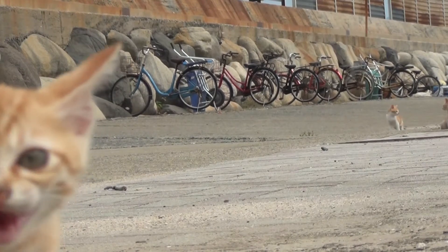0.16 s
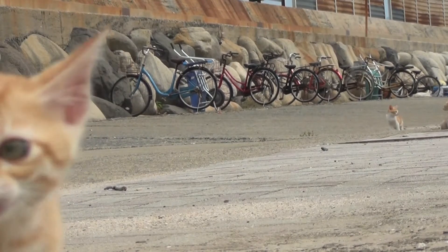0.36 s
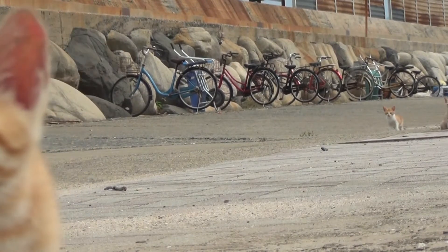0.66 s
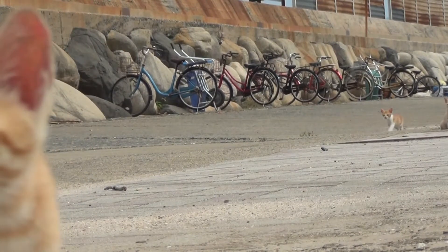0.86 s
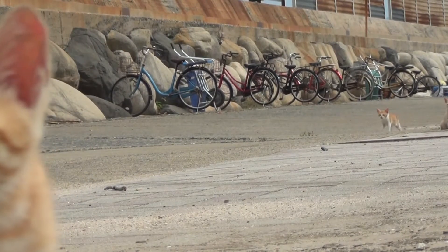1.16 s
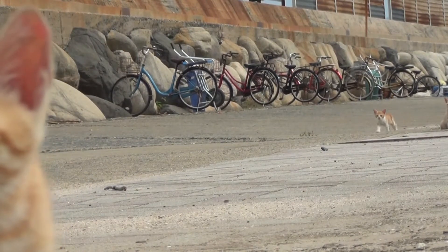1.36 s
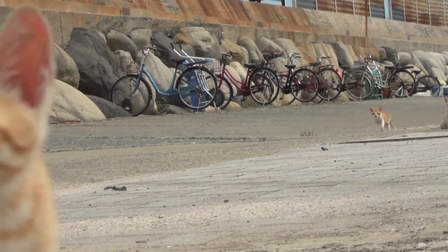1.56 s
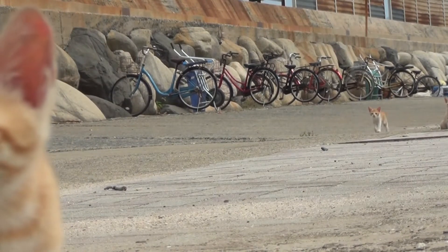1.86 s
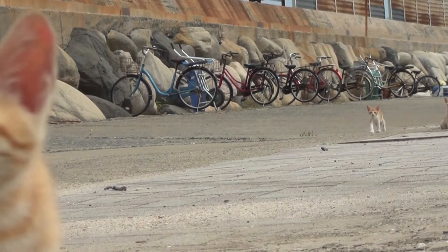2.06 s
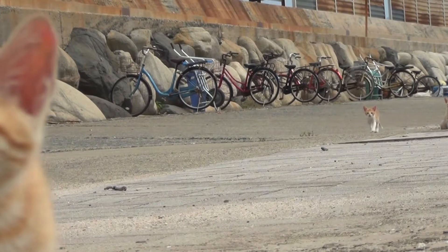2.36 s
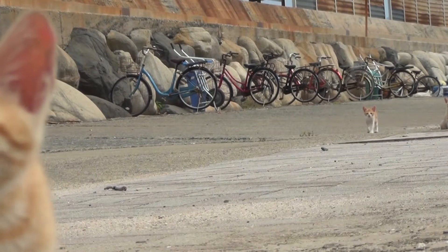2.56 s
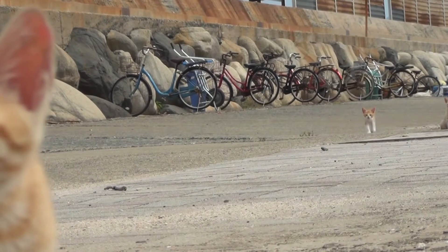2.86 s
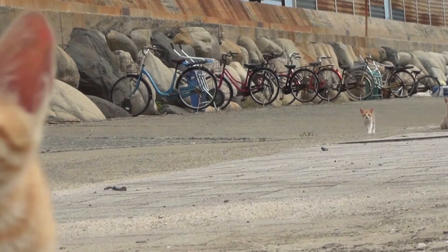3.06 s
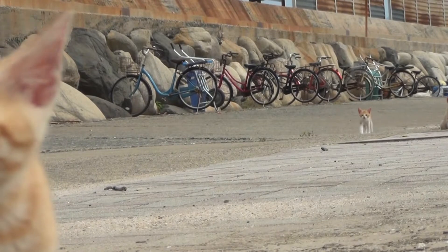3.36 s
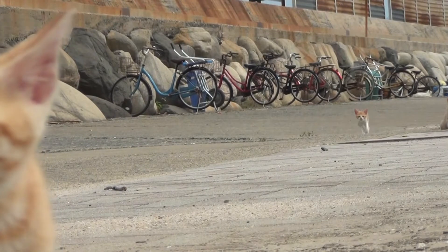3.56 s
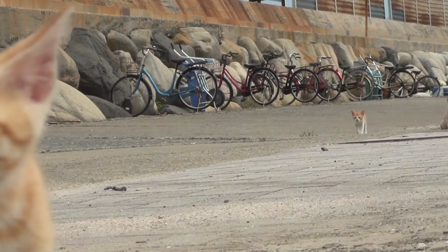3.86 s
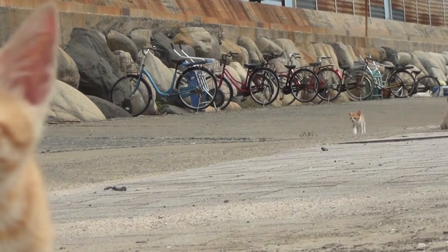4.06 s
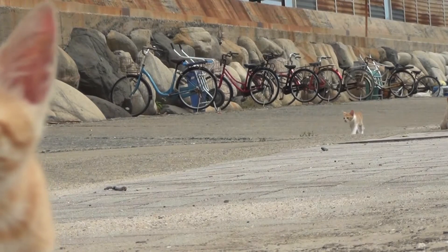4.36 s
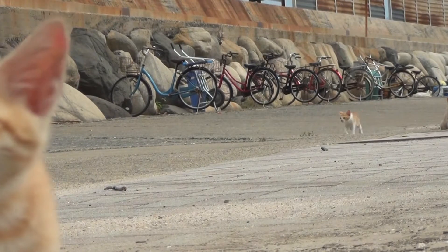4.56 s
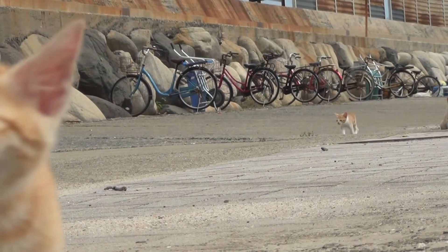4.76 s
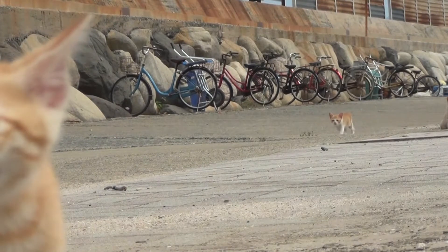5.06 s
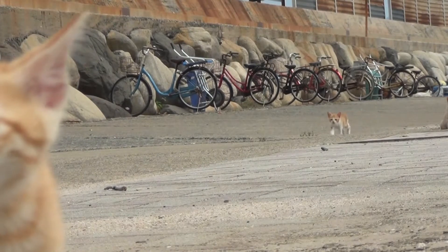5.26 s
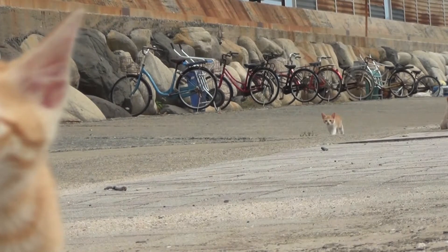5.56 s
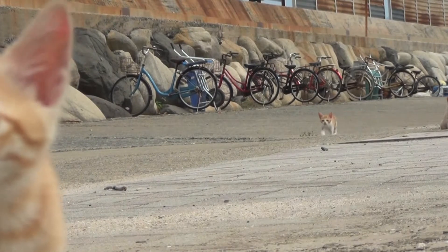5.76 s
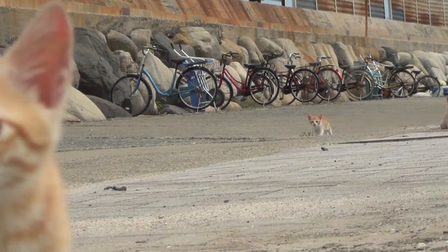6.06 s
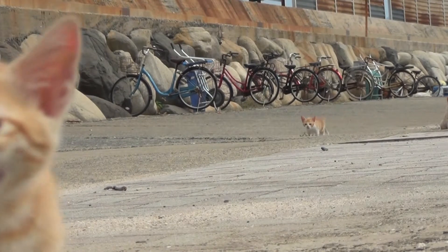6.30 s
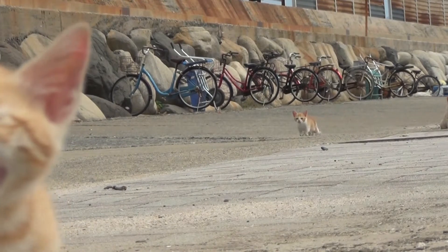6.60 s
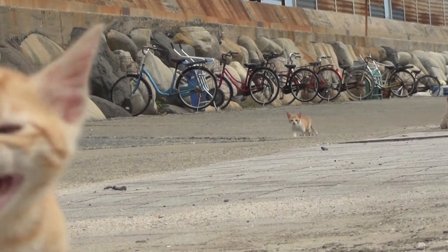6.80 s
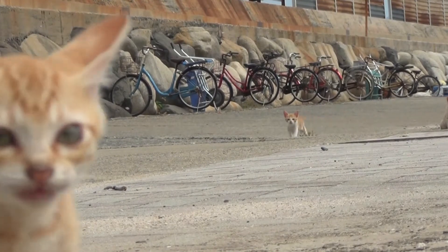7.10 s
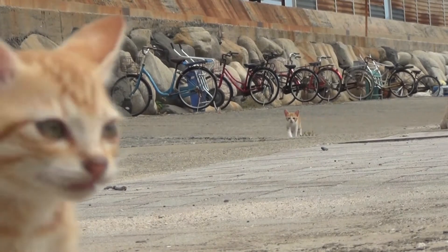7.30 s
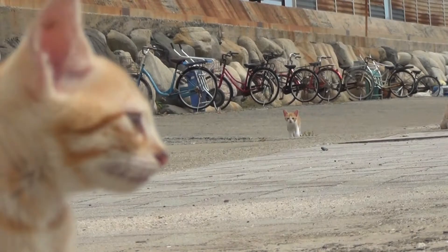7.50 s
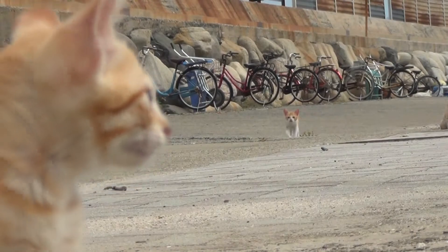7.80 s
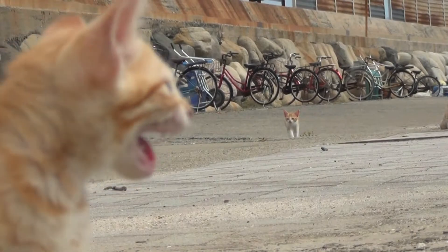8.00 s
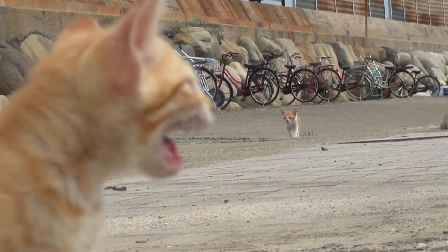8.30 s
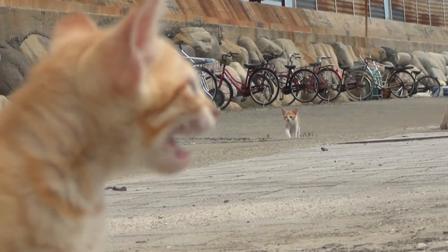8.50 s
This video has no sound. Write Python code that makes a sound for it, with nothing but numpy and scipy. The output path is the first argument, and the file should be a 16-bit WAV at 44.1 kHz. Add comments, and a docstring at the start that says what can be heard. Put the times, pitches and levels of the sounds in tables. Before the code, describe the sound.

Close to the microphone and slightly left, a small kitten meows five times, the first already under way. The calls are high, thin and pleading, scooping up, then sliding down as the mouth closes, with pauses of under a second to about a second and a half. Behind lies an open harbour quay: airy wash, a distant engine humming low, and soft rumble that swells most under the fourth meow. Almost no echo.

```python
"""A kitten close by, left of centre, gives five long, falling meows on an open quay.
The first is already under way; the others start hoarse, brighten as the mouth opens and darken as it shuts.
Each meow is a sum of harmonics, rasp and half-pitch lines, with levels set by a moving vocal tract.
Two small ticks are filtered noise bursts; a distant engine is noise in narrow exhaust resonances.
Shaped noise makes the harbour air and a low rumble that swells now and then, most during the fourth meow."""
import sys
import numpy as np
from scipy import signal
from scipy.fft import rfft, irfft, next_fast_len
from scipy.io import wavfile

SR = 44100
rng = np.random.default_rng(int(sys.argv[2]) if len(sys.argv) > 2 else 0)


def wav_out(sig):
    """Save sig, one row per channel (or a flat mono array), as 16-bit PCM at SR to the path in sys.argv[1]."""
    wavfile.write(sys.argv[1], SR, np.round(np.clip(np.atleast_2d(sig).T, -1, 1) * 32767).astype(np.int16))


N = 381024
TIME = np.arange(N) / SR

# The five meows. Each row: start in seconds, end in seconds, length of the upward scoop in seconds,
# final fall as a share of pitch, hoarseness with the mouth wide open (0-1),
# time the tongue stays down in seconds, extra treble in dB.
MEOWS = [(-.3, .53, .1, 0.073, 0.37, 0.31, 5), (2.018, 3.555, .17, 0.23, .45, 0.49, 2.5),
         (4.443, 5.684, .09, 0.22, 0.08, 0.56, -0.5), (6.22, 7.138, .12, .24, 0.09, 0.63, 1),
         (7.929, 8.609, 0.097, 0.25, 0.07, 0.48, -.5)]
# Melody between scoop and fall, one list a meow. Each row: time in seconds, pitch in Hz.
MELODIES = [
    [(0.0, 627), (0.014, 622), (0.1, 604.8), (0.244, 543), (0.274, 559), (0.41, 477)],
    [(2.18, 694), (2.378, 680), (2.46, 647), (2.638, 574), (2.738, 553), (2.874, 544), (2.974, 530),
     (3.088, 593), (3.152, 604), (3.256, 581), (3.46, 504)],
    [(4.52, 670), (4.548, 658), (4.576, 632.6), (4.778, 646.1), (4.856, 630), (4.952, 610), (5.11, 536.4),
     (5.172, 530.4), (5.28, 532), (5.344, 509.6), (5.476, 493), (5.59, 466.9)],
    [(6.33, 629), (6.386, 629), (6.396, 653), (6.556, 626.5), (6.582, 607.6), (6.76, 587), (6.798, 597.3),
     (6.834, 576), (6.852, 554.4), (7.04, 489)],
    [(8.02, 636), (8.066, 632), (8.078, 616), (8.118, 604), (8.14, 625), (8.344, 603.5), (8.452, 523),
     (8.482, 518.8), (8.52, 499)],
]
# Jaw and effort, one list a meow. Each row: time in seconds, mouth resonance in Hz, effort in dB.
GESTURES = [
    [(0, 3030, -4.5), (.12, 2500, 0.5), (.18, 1650, -5.5), (.25, 1450, 4), (.33, 1313, 0.5),
     (.42, 1080, -3.5), (.52, 1020, -17)],
    [(2.15, 3500, -6.5), (2.27, 3550, -9.5), (2.44, 3220, -5), (2.52, 2570, -5.5), (2.62, 1810, -5),
     (2.82, 1540, -6), (2.98, 1500, -2), (3.06, 1790, -2.5), (3.18, 2640, -5), (3.33, 1930, 0),
     (3.48, 1760, -0.5), (3.55, 1605, -8)],
    [(4.55, 4000, -1.5), (4.7, 4300, 0), (4.86, 4030, 1.5), (4.95, 3690, 1), (5.0, 3360, -0.5),
     (5.075, 2900, -4.5), (5.11, 2015, 1), (5.32, 2023, 0), (5.43, 1863, -2), (5.54, 1840, 2.5),
     (5.68, 1620, -5.5)],
    [(6.29, 4150, -2.5), (6.36, 4610, 1), (6.41, 4660, 2.5), (6.49, 4570, 3.5), (6.55, 4320, 5.5),
     (6.77, 4180, 3.5), (6.86, 3405, 2), (6.92, 2785, 4), (7.01, 1860, 1.5), (7.13, 1440, -6.5)],
    [(8.02, 4660, -1), (8.16, 4240, -4), (8.26, 4080, -3.5), (8.35, 4230, -2), (8.41, 3120, -0.5),
     (8.47, 2720, -2), (8.53, 1956, -7.5), (8.61, 1500, -14)],
]
# The kitten's place, from the left towards the middle. Each row: time in seconds, left minus right in dB.
PAN = [(0, 1.9), (3, 2.5), (5.3, 2), (6.5, 2), (8.3, 1)]


def kitten():
    """The meows, a little to the left."""
    pan_db, = in_time(PAN, TIME)
    voice = sum(meow(*call) for call in zip(MEOWS, MELODIES, GESTURES))
    return voice * from_db(pan_db * np.array([[.5], [-.5]]))


SCOOP_SHARE, SCOOP_BEND = .21, 1.5  # the pitch starts this share below its melody
FALL_S, FALL_BEND = .105, 1.4  # and drops at the end as the folds slacken
ONSET_ROUGH_S = .07  # the folds settle over this time
ONSET_WOBBLE, WOBBLES_PER_S = 0.0197, 45  # before that they stagger in pitch
OPENING_S, OPENING_SHARE = 0.049, 0.45  # the mouth resonance starts this share lower
ATTACK_S, ATTACK_DB, RELEASE_S = .055, 21.5, 0.018  # effort builds from this far below; the voice stops quickly
TONGUE_SNAP = 7.4  # how briskly the tongue lifts
# Strength of the rasp beside the harmonics, before hoarseness scales it. Each row: frequency in Hz, level in dB.
RASP = [(1200, -20), (3000, -11), (5000, -5.5), (7000, 2.5), (12000, -1)]


def meow(row, melody, gesture, jitter=0.0033, cycle_jitter=0.19, shimmer_db=0.94, rasp_burst_db=1.0, count=60):
    """The vocal folds give harmonics, rasp and at times half-pitch lines, all shaped by the tract."""
    start, end, scoop_s, fall, hoarse, tongue_s, treble_db = row
    t = TIME[(TIME >= start) & (TIME < end)]
    age, left = t - start, end - t
    # the pitch scoops up, follows its melody and drops
    pitch, = in_time(melody, t)
    pitch = pitch * (1 - SCOOP_SHARE * ramp(1 - age / scoop_s) ** SCOOP_BEND)
    pitch = pitch * (1 - fall * ramp(1 - left / FALL_S) ** FALL_BEND)
    pitch = pitch * (1 + ONSET_WOBBLE * np.exp(-age / ONSET_ROUGH_S) * flutter(t, WOBBLES_PER_S))
    # the mouth opens as the effort builds
    mouth_hz, effort_db = in_time(gesture, t)
    mouth_hz = mouth_hz * (1 - OPENING_SHARE * np.exp(-age / OPENING_S))
    effort_db = effort_db - ATTACK_DB * np.exp(-age / ATTACK_S)
    tongue_down = np.exp(-(age / tongue_s) ** TONGUE_SNAP)
    rough, doubling = hoarseness(t, age, mouth_hz, hoarse)
    # hoarse folds waver more, and their rasp comes in short bursts
    pitch = pitch * (1 + jitter * (1 + 2 * rough) * flutter(t, 90.04))
    rough = rough * from_db(rasp_burst_db * flutter(t, 48.2))
    # uneven cycles smear the high harmonics most
    phase = 2 * np.pi * np.cumsum(pitch) / SR + cycle_jitter * rough * flutter(t, 450)
    coarse = slice(None, None, 64)  # the tract moves slowly enough to be computed every 64 samples
    tract_state = [x[coarse] for x in (tongue_down, mouth_hz, effort_db)]
    out = np.zeros(len(t))
    for k in range(2, count):  # k counts half-harmonics
        hz = k / 2 * pitch[coarse]
        gain = np.interp(t, t[coarse], tract(t[coarse], hz, *tract_state, treble_db))
        # strong and weak cycles in turn put lines halfway between the harmonics
        line = doubling if k % 2 else 1
        rasp = from_db(at_hz(RASP, hz.mean())) * rough * flutter(t, 330)
        # the tract spreads each pulse in time: k * k / 20
        out += gain * (line + rasp) * np.cos(k / 2 * phase + k * k / 20)
    fade = ramp(np.minimum(age, left) / RELEASE_S)
    shimmer = from_db(shimmer_db * flutter(t, 68.83))
    out *= fade * shimmer / np.sqrt(1 + rough ** 2)
    before = np.searchsorted(TIME, start)
    return np.pad(out, (before, N - before - len(t)))


ONSET_ROUGH, ONSET_DOUBLING = 0.7, 0.18  # hoarse and skipping cycles at first
CALM_ROUGH, CALM_DOUBLING = 0.046, 0.019  # what remains once settled
CRACK_EDGE_S = 0.024
# The voice cracks. Each row: start in seconds, end in seconds, added roughness (0-1),
# added share of period doubling (0-1).
CRACKS = [(2.11, 2.19, .35, .15), (4.51, 4.56, .05, .6), (4.57, 4.78, .3, .03), (6.35, 6.52, .27, .8),
          (8.065, 8.135, .2, .3)]


def hoarseness(t, age, mouth_hz, hoarse):
    """Roughness and period doubling: at the onset, with a wide mouth, and where the voice cracks."""
    settling = np.exp(-age / ONSET_ROUGH_S)
    widest_hz = VOWELS[-1][0]
    rough = CALM_ROUGH + ONSET_ROUGH * settling + hoarse * (mouth_hz / widest_hz) ** 2
    doubling = CALM_DOUBLING + ONSET_DOUBLING * settling
    for start, end, added, share in CRACKS:
        inside = ramp(np.minimum(t - start, end - t) / CRACK_EDGE_S + .5)
        rough, doubling = rough + added * inside, doubling + share * inside
    return ramp(rough), ramp(doubling)


NOSE_HZ, NOSE_WIDTH_HZ, NOSE_DB = 6000, 900, -26  # faint, and also sounds with the mouth nearly shut
# Fixed colour of the throat. Each row: frequency in Hz, gain in dB.
THROAT = [(600, -15), (1100, 1.5), (1400, 8), (1850, 2), (2400, -11), (3100, -28), (4500, -29), (8000, -49)]
# Fixed colour of the upper resonance. Each row: frequency in Hz, gain in dB.
UPPER = [(3000, -15), (4500, -6), (5300, -1), (6200, -7), (7100, -8), (7800, -7.5), (9000, -9.3),
         (10000, -11), (11000, -16), (15500, -26)]
# The head turns to the side. Each row: time in seconds, turn from 0 facing to 1 in profile.
TURN = [(7.2, 0), (7.6, 1)]
# Change of colour in profile. Each row: frequency in Hz, gain in dB.
PROFILE = [(1300, -1), (1850, 0.5), (2500, 6.5), (3100, -4.5), (3800, -3), (5600, -5.5), (7500, -10.5),
           (9300, -3), (11800, 0), (13800, 7)]
# Fixed peaks and hollows of the head. Each row: centre in Hz, half-width in Hz, gain in dB.
HEAD = [(6200, 500, 1), (9300, 650, 5), (10550, 450, -7)]


def tract(t, hz, tongue_down, mouth_hz, effort_db, treble_db,
          mouth_width_hz=340, widening=1.0, upper_width_hz=2000, leak_db=-20,
          top_hz=12000, top_width_hz=1400, top_db=-30, back_hz=3100, back_width_hz=260, back_db=-4):
    """Height of a partial at frequency hz: the throat, two moving and three fixed resonances side by side."""
    throat_db, mouth_db, upper_hz, upper_db = vowel(tongue_down, mouth_hz, effort_db)
    turn, = in_time(TURN, t)
    opening = mouth_hz / 2000
    throat = from_db(throat_db + at_hz(THROAT, hz))
    # an open mouth radiates more, so its resonance is wider
    mouth = from_db(mouth_db) * resonance(hz, mouth_hz, mouth_width_hz * opening ** widening) ** 2
    # some treble leaks past the upper resonance on either side
    upper_shape = np.hypot(resonance(hz, upper_hz, upper_width_hz) ** 2, from_db(leak_db))
    upper = from_db(upper_db + treble_db + at_hz(UPPER, hz)) * upper_shape
    # two fixed resonances get out only through an open mouth
    gape = (opening / 2) ** 4
    back = from_db(throat_db + back_db) * gape * resonance(hz, back_hz, back_width_hz)
    top = from_db(upper_db + top_db) * gape / 2 * resonance(hz, top_hz, top_width_hz)
    nose = from_db(throat_db + NOSE_DB) * resonance(hz, NOSE_HZ, NOSE_WIDTH_HZ)
    head_db = turn * at_hz(PROFILE, hz)
    head_db = head_db + sum(db * resonance(hz, centre, width) for centre, width, db in HEAD)
    power = throat ** 2 + mouth ** 2 + upper ** 2 + back ** 2 + top ** 2 + nose ** 2
    return np.sqrt(2 * power) * from_db(head_db)


THROAT_FOLLOWS, UPPER_FOLLOWS = 0.56, 1.24  # dB gained per dB of effort; the mouth follows one to one
TONGUE_HZ = 6290  # the upper resonance while the tongue is down
STRAIN_HZ_PER_DB = 90  # effort raises the upper resonance once the tongue lifts
# The tract from nearly shut to wide open, at zero effort. Each row: mouth resonance in Hz,
# throat level in dB, mouth level in dB, upper resonance in Hz, upper level in dB.
VOWELS = [(1150, -57, -23.5, 7900, -65), (1510, -40.5, -20, 10400, -51.5), (1900, -37, -26, 8740, -51.5),
          (2480, -38, -32, 8660, -43.5), (3300, -38, -31.5, 9250, -35.5), (4110, -37, -28.5, 7500, -29.5),
          (4690, -44.5, -37, 7000, -24.5)]


def vowel(tongue_down, mouth_hz, effort_db):
    """Jaw and tongue set the resonances; effort lifts the high ones most."""
    throat_db, mouth_db, upper_hz, upper_db = in_time(VOWELS, mouth_hz)
    lifted_hz = upper_hz + STRAIN_HZ_PER_DB * effort_db
    upper_hz = tongue_down * TONGUE_HZ + (1 - tongue_down) * lifted_hz
    throat_db = throat_db + THROAT_FOLLOWS * effort_db
    return throat_db, mouth_db + effort_db, upper_hz, upper_db + UPPER_FOLLOWS * effort_db


def near_echo(sound, echo_db=-13, left_s=0.000823, right_s=0.000844):
    """One close, inverted reflection ripples the spectrum, a little differently on each side."""
    echo = [np.interp(TIME - delay, TIME, channel) for channel, delay in zip(sound, (left_s, right_s))]
    return sound - from_db(echo_db) * np.array(echo)


def quay(sound, scatter_db=-24, t60=0.052):
    """Ground and sea wall scatter a faint, short tail."""
    t = np.arange(SR // 2) / SR
    tail = rng.standard_normal((2, len(t))) * from_db(-60 * t / t60) * (t > .003)
    tail /= np.sqrt(np.sum(tail ** 2, axis=1, keepdims=True))
    return from_db(scatter_db) * signal.fftconvolve(sound, tail, axes=1)[:, :N]


# Parts of two small ticks, the second made of three resonances.
# Each row: start in seconds, level before the decay in dB, centre in Hz.
TICK_PARTS = [(.731, -45, 14000), (3.057, -30, 3050), (3.057, -39, 4500), (3.056, -44, 11800)]


def ticks(t60=0.038, width_share=0.07):
    """Each part of a tick is a tiny, decaying burst of noise in one broad resonance."""
    out, t = np.zeros(N), np.arange(SR // 20) / SR
    hz = np.fft.rfftfreq(len(t), 1 / SR)
    for s, db, centre in TICK_PARTS:
        noise = rfft(rng.standard_normal(len(t)))
        grain = irfft(noise * resonance(hz, centre, width_share * centre), len(t))
        at = int(s * SR)
        out[at:at + len(t)] += rms_one(grain) * from_db(db - 60 * t / t60)
    return out


# Level of the distant engine. Each row: time in seconds, level in dB.
ENGINE_LEVEL = [(0, -27), (1.3, -25.5), (2.4, -29), (3.2, -28.5), (3.9, -31.5), (5.1, -26), (6.2, -28.5),
                (7.1, -25.5), (7.8, -29.5), (8.64, -30.5)]
# Its exhaust resonances. Each row: centre in Hz, full width at half gain in Hz, relative level in dB.
EXHAUST = [(136.8, 30, 1), (171, 60, -10), (199.6, 22, -6.5)]


def engine():
    """Far exhaust noise booms in a few narrow resonances."""
    def exhaust(hz):
        return sum(from_db(db) * resonance(hz, centre, width / 2) for centre, width, db in EXHAUST)
    level_db, = in_time(ENGINE_LEVEL, TIME)
    return from_db(level_db) * stereo_noise(exhaust)


AIR_DB = -32.5
DEEP_HZ, DEEP_WIDTH_HZ = 46.4, 90  # deep bass: centre and half-width
# Colour of the harbour air. Each row: frequency in Hz, relative density in dB per Hz.
AIR = [(25, -15), (60, -4), (100, -2), (250, -3), (450, -5), (900, -12), (1300, -18.5), (2100, -21),
       (2500, -26.5), (4200, -28), (5000, -34.5), (9000, -36.5), (13000, -37.5), (16000, -49)]
# Colour of the rumble. Each row: frequency in Hz, relative density in dB per Hz.
RUMBLE = [(25, -16.5), (80, -4.5), (200, -7), (350, -11), (700, -21), (1400, -33), (3000, -55),
          (8000, -53.5)]


def harbour(lumpy_db=1.0):
    """A steady wash of air, and a lumpy rumble that swells and sinks."""
    air = from_db(AIR_DB) * stereo_noise(lambda hz: from_db(at_hz(AIR, hz)))
    rumble = stereo_noise(lambda hz: from_db(at_hz(RUMBLE, hz)))
    deep = stereo_noise(lambda hz: resonance(hz, DEEP_HZ, DEEP_WIDTH_HZ))
    rumble_gain, deep_gain = swells()
    lumps = from_db(lumpy_db * flutter(TIME, 14))
    return air + lumps * (rumble_gain * rumble + deep_gain * deep)


SWELL_RISE_S, RUMBLE_REST_DB = 0.11, -46
# Swells of low rumble. Each row: start in seconds, hold after the rise in seconds, rumble level in dB,
# decay time constant in seconds, deep bass level in dB.
SWELLS = [(-.1, 0.13, -27.5, 0.34, -39), (1.25, 0.23, -29, 0.98, -43), (2.236, 0.03, -27.5, 0.2, -47),
          (2.55, 0.24, -31.5, 0.33, -44), (5.05, 0.95, -34, 0.9, -35), (6.545, 0.22, -18.5, 0.39, -52),
          (7.14, 0.19, -31.5, 0.43, -36), (7.95, 0.29, -45, .4, -39.5)]


def swells():
    """Gains of the rumble and of its deep bass: each swell rises, holds and dies away."""
    power, deep_power = from_db(RUMBLE_REST_DB) ** 2, 0
    for start, hold, db, decay, deep_db in SWELLS:
        age = TIME - start
        shape = ramp(age / SWELL_RISE_S) * np.exp(-np.maximum(age - SWELL_RISE_S - hold, 0) / decay)
        power = power + (from_db(db) * shape) ** 2
        deep_power = deep_power + (from_db(deep_db) * shape) ** 2
    return np.sqrt(power), np.sqrt(deep_power)


# Left-right likeness of the background. Each row: frequency in Hz, likeness (0-1).
LIKENESS = [(60, 0.57), (140, 0.94), (280, 0.63), (550, 0.84), (1200, 0.78), (4000, 0.4), (12000, 0.8)]
# Balance of the background. Each row: frequency in Hz, left minus right in dB.
LEAN = [(200, 0.5), (700, 2.5), (4400, 3.5), (8000, 0.5)]


def stereo_noise(colour):
    """Noise whose gain is colour(Hz), partly alike in both channels and leaning left; rms 1."""
    size = next_fast_len(N)
    hz = np.maximum(np.fft.rfftfreq(size, 1 / SR), 1)
    mid, side = rfft(rng.standard_normal((2, size)))
    alike = np.clip(at_hz(LIKENESS, hz), 0, 1)
    pair = np.sqrt(1 + alike) * mid + np.sqrt(1 - alike) * side * [[1], [-1]]
    pair *= from_db(at_hz(LEAN, hz) * [[.5], [-.5]])
    low_cut = hz / np.hypot(hz, 20)
    return rms_one(irfft(pair * colour(hz) * low_cut, size)[:, :N])


def from_db(db):
    """Decibels to gain."""
    return 10 ** (np.asarray(db) / 20)


def rms_one(x):
    """Scale to unit power."""
    return x / np.sqrt(np.mean(x ** 2) + 1e-20)


def ramp(x):
    """Hold between 0 and 1."""
    return np.clip(x, 0, 1)


def in_time(rows, t):
    """The columns of a curve, read at the values t of its first column."""
    s, *columns = np.transpose(rows)
    return [np.interp(t, s, c) for c in columns]


def at_hz(points, hz):
    """Read a spectrum on a log-frequency axis."""
    f, value = np.transpose(points)
    return np.interp(np.log(hz), np.log(f), value)


def flutter(t, rate):
    """Random values, rate a second, joined by lines; rms 1."""
    knots = np.arange(t[0], t[-1] + 2 / rate, 1 / rate)
    return rms_one(np.interp(t, knots, rng.standard_normal(len(knots))))


def resonance(hz, centre, width):
    """Gain of a resonance with steep skirts: 1 on top, half at width Hz to either side."""
    return 1 / (1 + ((hz - centre) / width) ** 2)


def scene():
    """The kitten in front of the harbour background."""
    voice = near_echo(kitten())
    return voice + quay(voice) + ticks() + engine() + harbour()


CUTOFF_HZ = 15900


def record(dry, whine_db=-70):
    """A faint, steady, very high whine joins the scene, and a steep low-pass cuts the top."""
    whine = np.sqrt(2) * from_db(whine_db) * np.sin(2 * np.pi * 15734 * TIME)
    low_pass = signal.ellip(12, .1, 80, CUTOFF_HZ, fs=SR, output="sos")
    return signal.sosfilt(low_pass, dry + whine)


dry = scene()
out = record(dry)
wav_out(out)
```